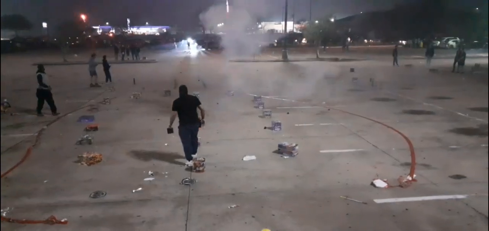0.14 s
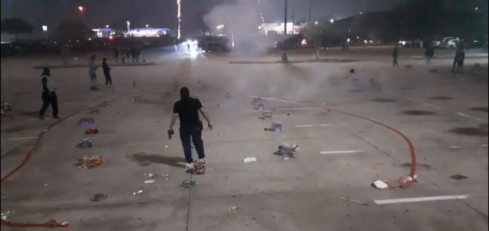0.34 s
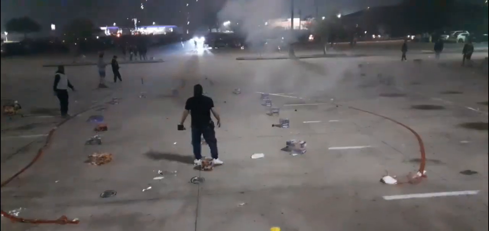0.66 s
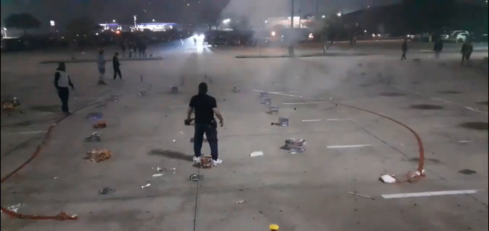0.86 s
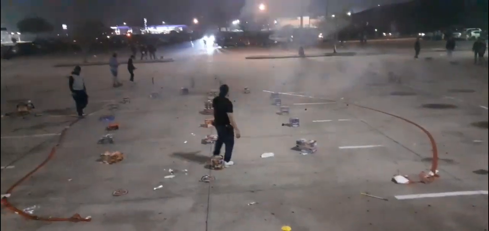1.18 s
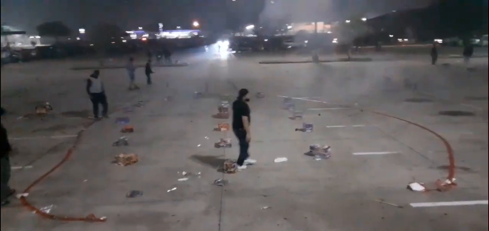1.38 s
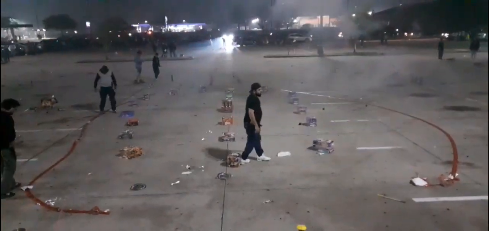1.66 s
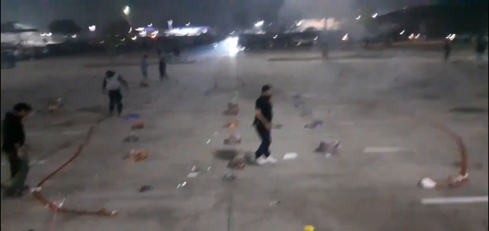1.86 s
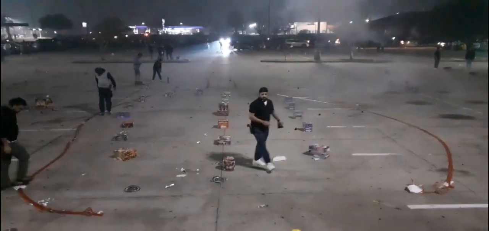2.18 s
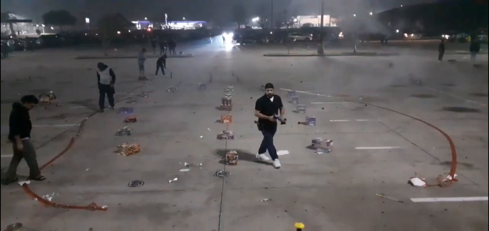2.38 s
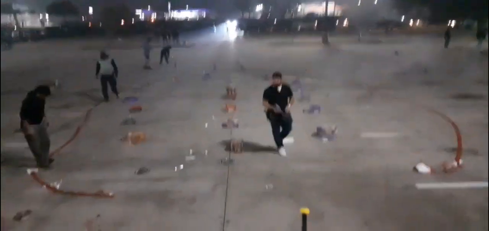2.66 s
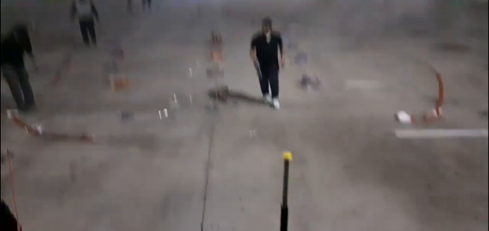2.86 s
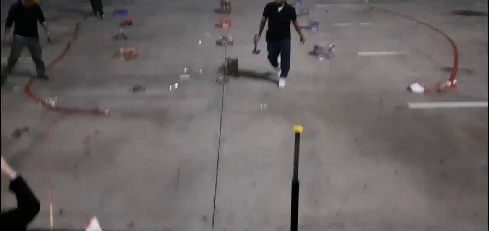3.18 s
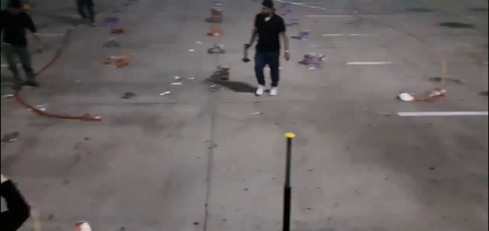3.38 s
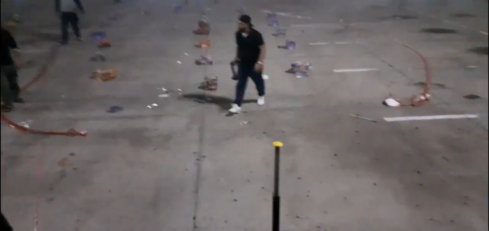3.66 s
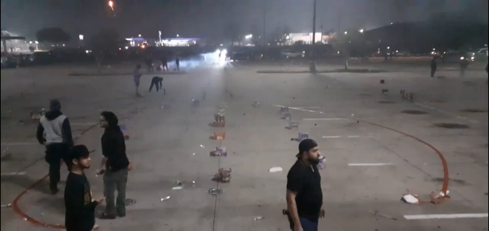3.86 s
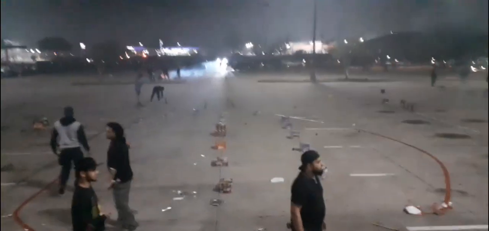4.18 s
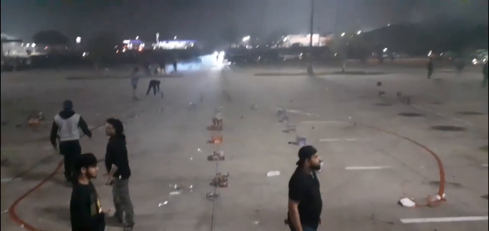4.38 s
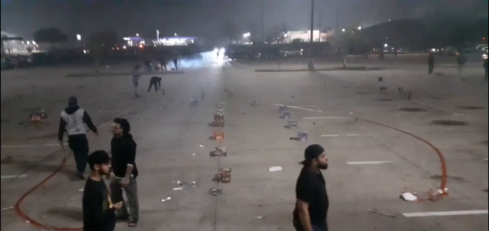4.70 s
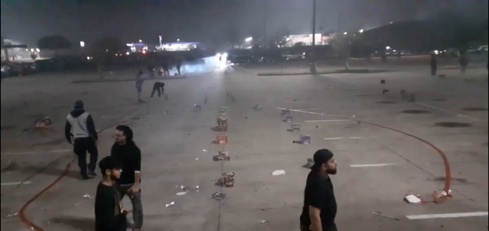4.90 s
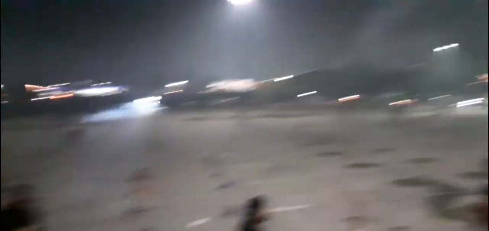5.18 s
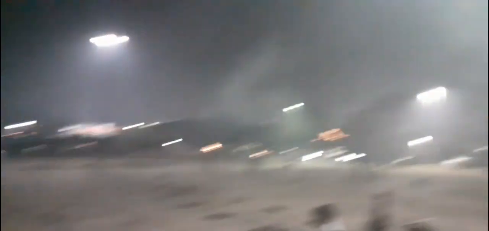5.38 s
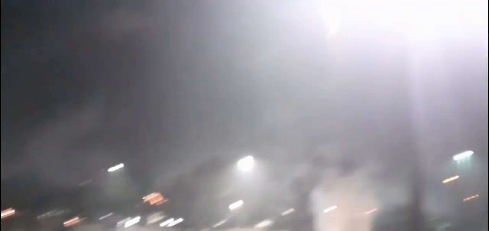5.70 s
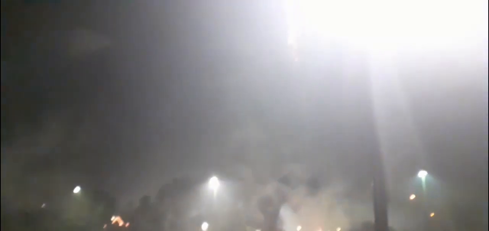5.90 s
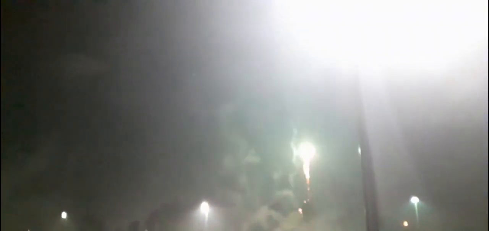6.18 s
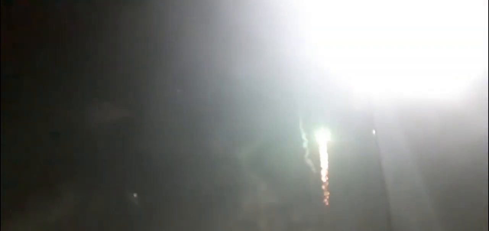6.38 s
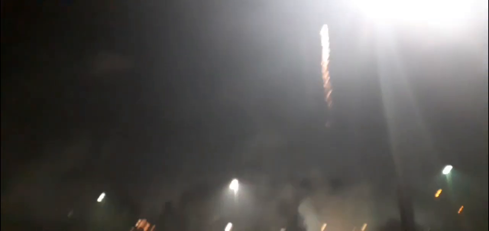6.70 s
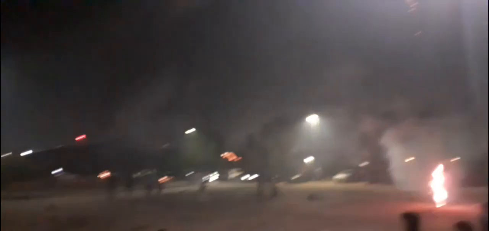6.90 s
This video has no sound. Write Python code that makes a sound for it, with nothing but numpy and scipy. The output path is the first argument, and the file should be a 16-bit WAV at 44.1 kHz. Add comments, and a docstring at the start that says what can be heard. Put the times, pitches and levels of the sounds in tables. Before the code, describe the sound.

Outdoors at night in a wide parking lot, a heavy firework boom hits at 0 s, a few low pushes rolling together and fading within half a second. Sharp near firecrackers snap from the very start in quick, uneven clusters, each with a ground bounce, short wall slaps and an echo. Behind them, farther fireworks and building echoes merge into rumble, clatter and crackle. Snaps bunch tightly around 2.6-2.8 s. At about 2.97 s the sound cuts to total silence, returning abruptly at 3.77 s with hard, dense bangs. Low thuds land near 4.4, 4.9 and 6.9 s; the volley continues unbroken to the end, about 7 s. Limiting holds loud snaps level and lets echoes swell between them. The crackers are to the right, shifting near centre around 5.3-5.7 s, then partly back right near 7 s. Treble is dull.

```python
"""An open parking lot at night: a firework booms, and strings of firecrackers snap in quick, uneven volleys.
Each cracker is a pressure spike with echoes; the boom, thuds, blurred bursts and far crackle are noise and pops.
The buildings' echoes merge with farther fireworks into a rolling crackle. The camera's limiter holds the loud
snaps to one height and ducks the rest, so echoes swell in the pauses. The camera has the near crackers on its
right, turns towards them late on, then partly back; the sound cuts out once for most of a second."""
import sys
import numpy as np
from scipy import signal
from scipy.fft import rfft, irfft
from scipy.io import wavfile
from scipy.ndimage import uniform_filter1d, minimum_filter1d, map_coordinates

SR = 44100
rng = np.random.default_rng(int(sys.argv[2]) if len(sys.argv) > 2 else 0)


def output_pcm(signal):
    """Save a mono or channel-first signal as 16-bit PCM at the path in sys.argv[1].

    Samples are clipped to [-1, 1] before scaling.
    """
    pcm = np.clip(np.atleast_2d(signal).T, -1, 1) * 32767
    wavfile.write(sys.argv[1], SR, np.round(pcm).astype(np.int16))


N = 310812


def amp(db):
    """Turn decibels into a gain."""
    return 10 ** (np.asarray(db) / 20)


def unit(x):
    """Scale to an average strength (rms) of 1."""
    return x / np.sqrt(np.mean(x ** 2) + 1e-20)


def along(points, hz):
    """Read a curve of (Hz, value) points, joined by straight lines on a log frequency axis."""
    point_hz, values = np.transpose(points)
    return np.interp(np.log(hz + 1), np.log(point_hz + 1), values)


def curves(rows):
    """Draw one curve over the whole scene for each column after the time."""
    s, *columns = np.transpose(rows)
    return [np.interp(np.arange(N) / SR, s, column) for column in columns]


def causal(db):
    """Make the tightest pulse with this dB spectrum that has no sound before its start (minimum phase)."""
    cepstrum = irfft(np.log(amp(db)))
    size = cepstrum.shape[-1]
    # fold the mirrored half forward in time
    fold = 1 + np.sign(np.fft.fftfreq(size))
    return irfft(np.exp(rfft(cepstrum * fold)))


def coloured(x, points):
    """Filter x with a causal pulse that follows (Hz, dB) points."""
    pulse = causal(along(points, np.fft.rfftfreq(4096, 1 / SR)))
    return signal.oaconvolve(np.atleast_2d(x), pulse[None], axes=1)[:, :x.shape[-1]]


def add(track, s, sound):
    """Mix a sound into the track at time s."""
    start = max(round(s * SR), 0)
    part = track[..., start:start + sound.shape[-1]]
    part += sound[..., :part.shape[-1]]


def fade(t, t60, rise_s):
    """A rise and decay of energy 1 that starts at t = 0; the decay loses 60 dB in t60 seconds."""
    age = np.maximum(t, 0)
    shape = amp(-60 * age / t60) * (1 - np.exp(-age / rise_s))
    return shape / np.linalg.norm(shape)


def wobble(rate):
    """A smooth random curve with rate knots a second."""
    knots = rng.standard_normal(int(N * rate / SR) + 4)
    return map_coordinates(knots, [np.arange(N) * rate / SR])


def stereo(front, left, right, alike):
    """The power share alike is one wave for both microphones; the rest differs between them."""
    return np.sqrt(alike) * front + np.sqrt(1 - alike) * np.array([left, right])


# Pushes and rolls that build the opening boom, then later low thuds
# columns: start_s, level_db (start of the roll), t60_s, push_db (against the start of the roll)
PUSHES_AND_ROLLS = [(0, -19, .9, 17), (0.0315, -16, .13, 31.5), (0.0378, -10.5, 0.16, 29),
                    (.062, -9.5, 0.11, 23.5), (.099, -13.5, 0.31, 20), (.147, -17, 0.3, 19),
                    (4.424, -28, 0.21, 24), (4.861, -20, .15, 11), (6.902, -19.5, 0.15, 25)]
# Colour of the boom and thuds, columns: pitch_hz, level_db
BOOM_COLOUR = [(25, -36.5), (60, -34), (110, -9.5), (170, -2.5), (220, -2.5), (310, 4), (400, -7.5),
               (580, -22.5), (740, -13.5), (1100, -40), (2500, -35.5), (6000, -70)]


def boom_and_thuds():
    """Each row is one sharp push and a roll of noise that fades steadily in dB; several rows build the boom."""
    track, t = np.zeros(N), np.arange(SR) / SR
    for s, db, t60, push_db in PUSHES_AND_ROLLS:
        roll = amp(-60 * t / t60) * rng.standard_normal(len(t))
        roll[0] -= amp(push_db)
        add(track, s, amp(db) * roll)
    # make up for the strength that the colour filter gives to noise
    gain = np.sqrt(np.mean(amp(along(BOOM_COLOUR, np.linspace(0, SR / 2, SR))) ** 2))
    return coloured(track / gain, BOOM_COLOUR)


# Where the near crackers lie: how much later the left microphone hears them, camera shadow included
# columns: time_s, delay_ms
CRACKER_BEARING = [(0, .5), (2.9, 0.501), (3.8, .475), (5.15, 0.49), (5.45, .3), (5.7, .14), (6.2, 0.15),
                   (6.75, 0.16), (7.05, 0.36)]


def from_the_right(x):
    """A wave reaches the right microphone first; the camera's shadow adds its own little delay later."""
    delay_ms, = curves(CRACKER_BEARING)
    shadow_ms = .07
    late = map_coordinates(x, [np.arange(N) - (delay_ms - shadow_ms) * SR / 1000], order=3)
    return np.array([late, x])


def pops(rate, spread_db, smear):
    """Random pops of uneven size, rms 1; the power share smear has blurred into steady noise."""
    size = amp(spread_db * np.clip(rng.standard_normal(N), -2, 2)) * rng.choice([-1, 1], N)
    separate = unit(size * (rng.random(N) < rate / SR))
    return np.sqrt(1 - smear) * separate + np.sqrt(smear) * rng.standard_normal(N)


def volley(colour, rate, spread_db, smear, alike, bearing=True):
    """Distant pops in stereo, rms 1: part is one wave at both microphones, the rest comes from all around."""
    front, left, right = (pops(rate, spread_db, smear) for _ in range(3))
    shared = from_the_right(front) if bearing else front
    return unit(coloured(stereo(shared, left, right, alike), colour))


# Near firecrackers; peak is before the limiter, thump is extra bass, snap is treble tilt
# columns: start_s, peak_db, thump_db, snap_db_per_octave
NEAR_CRACKERS = [(0.0077, -3, 10, 2), (0.0317, 1, 7, 2), (0.129, -4, 8, 2), (0.1976, 1, 7, 0.5),
                 (0.2189, 0.0, 9, -2), (0.2266, 1, -2, -4), (0.273, 2.5, -9, -2), (0.3333, -2, -10, 0),
                 (0.3661, -3, 0, 1), (0.3857, 3, 1, -5), (0.4578, 3, 0.5, 0), (0.4778, 3.0, 1, -5),
                 (0.51, -0.5, 2, -3.5), (0.5662, 0, -8, -7), (0.596, 0, -7, -8), (0.608, -1.5, -7, -4.5),
                 (0.6699, 1.5, -6, -4.5), (0.725, 3, -6, -1.5), (0.7305, 1, 6, -4), (0.7352, 3.5, 3.5, -5),
                 (0.7593, -6, -2, -1), (0.7825, 4.5, 3, -1), (0.8705, -7, 5, 1), (0.889, -2.5, -10, 0),
                 (0.9415, 2.5, -9, -1.5), (0.9447, 0.5, 7, 2), (1.0634, -1.5, -1, 1.5),
                 (1.1128, -2.5, -7, -3), (1.1228, 2.5, 2.5, 1), (1.1432, 2.5, 2, -1), (1.1964, -0.5, 1, -3),
                 (1.2772, 1.5, 0, 1), (1.3194, 4, 4, -1), (1.3269, 5, -4, 0), (1.3374, 4.5, 0, -1),
                 (1.414, 3.5, 6, 2.5), (1.6231, 5.5, 3, 1.5), (1.65, 3.5, -2, -1), (1.6637, 0.5, -5, -1),
                 (1.6932, 4.5, -1, 0), (1.7327, -0.5, -12, -3), (1.7929, 8.5, 3, -1.5), (1.8053, 6, -1, 0),
                 (1.8122, 2, 1, -5), (1.8249, 3.5, 1, -8), (1.9353, 7, 2, 4), (1.9541, 5.5, -3, -4),
                 (2.0089, 6.0, 7, 5), (2.0392, 3, -0.5, 0), (2.1305, 3.5, 1, 2.5), (2.2514, 5.5, 7, 2.5),
                 (2.2574, 7, -6, -1), (2.3093, 5, 4, 3.5), (2.3218, 3, 5, 2), (2.3393, 5, 2, 2),
                 (2.496, 3.5, -2.5, 0.5), (2.541, 4, 1, 1.5), (2.627, 3, -1, 4), (2.6347, 2, 4, 0),
                 (2.6392, 4.0, -7, -5), (2.6567, 7, 1, 2), (2.6728, 6, -6, 3), (2.6817, 6.5, -1, -3),
                 (2.694, 11.5, -6, 1), (2.6998, 9.0, -10, 1), (2.713, 8.5, 1, -6), (2.7268, 10, 2, -1),
                 (2.7717, 8.5, 2, 1), (2.8221, 4, -3, 3), (2.841, 6, 8, 5), (2.9447, 6, 1, -2),
                 (2.948, 1.5, 0, 8.5), (3.7957, 7.5, -1, 1.5), (3.802, 1, 4, 5), (3.8193, 9.5, 6, 2),
                 (3.8256, -1, -4, 9), (3.917, 5.5, -3.5, 2.5), (3.9379, 9, 4, 3.5), (3.974, 8, -1, 1.5),
                 (4.0127, 10.5, 4, 0), (4.0519, 10.5, 2, 0.5), (4.069, 8, -2, -6), (4.114, 2.5, -5, 0),
                 (4.1185, 3.0, -9, -8), (4.1224, 8, 2, 1.5), (4.1596, 4.0, 7, 6.5), (4.213, 7, 1, -4),
                 (4.2612, 5, 7, 1), (4.2898, 6.5, 1.5, -1), (4.2934, 6.5, 1, 0), (4.3073, 9, 5, 1),
                 (4.333, 2.5, 6, 6), (4.3551, 8.5, 5, 7), (4.3617, 6, -4, -13), (4.3717, 3.5, 1, 3),
                 (4.382, -2, -9, -4), (4.388, -3, 3, 1), (4.4295, 7.5, 8, 0), (4.5677, 6.5, 7, -1.5),
                 (4.6306, -2, 11, 4.5), (4.757, 6.0, 5, -1), (4.7661, 8.5, 4, 1), (4.7734, 4, 3, 2),
                 (4.777, 0, 6, 20), (4.7982, 4, -3, -2), (4.8037, 7.5, 3, 6), (4.8344, 5, 0, -1),
                 (4.851, 9.5, 9, 8.5), (4.8628, 6, 6, -1), (4.8718, 4.5, 17, 12), (4.9087, 1, 4, 0),
                 (4.9173, 6.5, -2, 0), (4.9636, 3, 7.5, 5), (4.9983, 5, 8, 2), (5.0838, -1.5, 5, 0.5),
                 (5.1324, 2.5, -7, -5), (5.2716, 2.5, -1, -3), (5.2917, 2.5, 8, -14), (5.3208, 4.5, -2, -5),
                 (5.3363, 6, 4, 1.5), (5.34, 2.5, -1, 0), (5.3773, 3.5, -1, 0.5), (5.4133, -1.5, 0, -13),
                 (5.4305, 2.0, -7, -6), (5.4891, 5.5, -5, -2.5), (5.532, 2, 3, -1.5), (5.5491, 8.5, 0, -4),
                 (5.5962, 8, -3, -1), (5.6043, 7.0, 0, -14), (5.618, 5.0, 2, 2), (5.6338, 6.5, -2, -5),
                 (5.6533, 5, 7, 3.5), (5.6798, 2.5, 4, 2.5), (5.711, 8, 0, -1.5), (5.8121, 7.5, 1, -1.5),
                 (5.8183, 3.5, 2, -8), (5.8634, 6, -4, 0), (5.8888, 1.5, -11, -10), (5.941, 3, 2, 3),
                 (5.9502, 5, -7, -3), (5.9587, 1.5, 2, -6), (5.9785, 5.5, 4, -1), (6.0005, 4, 2, -2),
                 (6.0343, 3, 0, 1), (6.0484, 3.0, -4, -7), (6.0563, 3, -3, -2), (6.0601, 0.5, -7, 3),
                 (6.1167, 3.5, -1, -4), (6.1516, 5.5, -3, -2.5), (6.1833, 2, 6, -1.5),
                 (6.2143, -1, -12, -1), (6.2904, 5.5, -5, -2), (6.3132, 7, -3, -7.5), (6.391, 6, -1, -6),
                 (6.4274, 4.5, 1, -6), (6.4563, 3.5, 10, 3.5), (6.4827, 1.5, 6.5, -3), (6.5031, 0, 8, -2),
                 (6.5176, 4, -6, -8), (6.5422, 6, -10, -2.5), (6.5735, 0.5, 3, 0), (6.6006, 5, -2, 2),
                 (6.6183, 3.5, -6, -11), (6.6261, 5, 3, 1.5), (6.644, 0.5, 0, -11), (6.6808, -2.5, -5, 2),
                 (6.6933, 3.5, 4, 2), (6.7145, 3.5, -8, 0), (6.7378, 5.5, -20, 1), (6.7602, 2.0, 5, 3),
                 (6.784, -4, -4, -9), (6.807, 6, 1, 1), (6.8242, 4, -1.5, 0), (6.8414, 8, -5, -0.5),
                 (6.8575, 4, -9, -2), (6.9266, 8, -10, 2.5), (6.9511, 6.5, -7, 1), (6.9561, 4, 6, -1),
                 (6.9708, -2, 11, 2), (6.976, 2.5, 13, 2), (6.9957, 3.5, 3, 1), (7.0218, 5.5, -8, -3)]
# The buildings' answer to each cracker
# columns: delay_s, rise_s, t60_s, rumble_db, clatter_db, crackle_db
BUILDING_ECHOES = [(.006, 0.0082, 0.98, -8, -5.5, -1), (.083, .002, 0.073, -9.5, -6, -2.5),
                   (0.556, .002, .04, -20, -17, -19.5)]


def echo_power(uneven_db=1.5):
    """Power that buildings send back as rumble, clatter and crackle; each takes a cracker a bit differently."""
    s, db, _, _ = np.transpose(NEAR_CRACKERS)
    t, power = np.arange(SR) / SR, np.zeros((3, N))
    uneven = uneven_db * rng.standard_normal((len(s), len(BUILDING_ECHOES)))
    strengths = amp(db[:, None] + uneven)
    for (delay, rise, t60, *bands_db), strength in zip(BUILDING_ECHOES, strengths.T):
        blasts = np.bincount(np.round(np.abs(s) * SR).astype(int), strength ** 2, N)
        spread = fade(t - delay, t60, rise_s=rise) ** 2
        answer = np.abs(signal.fftconvolve(blasts, spread)[:N])
        power += amp(bands_db)[:, None] ** 2 * answer
    return power


# The farther fireworks' own levels, before echoes and the overall trims join them
# columns: time_s, rumble_db, clatter_db, crackle_db
FAR_LEVELS = [(0, -22, -24, -23.5), (.2, -23, -34, -29.5), (.7, -35.5, -45, -33.5), (1.1, -39, -54, -36),
              (1.6, -36.5, -40, -41), (1.85, -34.5, -33, -27), (2.4, -28.5, -28, -25.5),
              (2.55, -35.5, -47, -34.5), (2.95, -32, -29, -28), (3.8, -29, -22.5, -21), (4, -40, -28, -38),
              (4.5, -30.5, -24.5, -32), (5.2, -34.5, -31.5, -31.5), (5.6, -28, -30.5, -24.5),
              (6.1, -38, -31.5, -30), (6.6, -30, -27.5, -26), (7.05, -43, -32, -29)]
# Colours of the far sounds, from dull to bright; only the shape counts
# columns: pitch_hz, level_db
RUMBLE_COLOUR = [(20, -28.5), (40, -23), (60, -4), (85, -8), (103, 3), (135, -1), (180, -3.5), (260, 3.5),
                 (340, 6.5), (430, -1), (560, -11.5), (1000, -44.5)]
CLATTER_COLOUR = [(200, -36), (380, -11.5), (480, -2.5), (750, 3), (1100, -3), (1400, -10), (2500, -28)]
CRACKLE_COLOUR = [(600, -39.5), (1000, -6.5), (1300, -2), (1900, 4), (2600, 1), (3500, -5.5), (4800, -11.5),
                  (6300, -25)]


def far_fireworks(rumble_db=-0.5, clatter_db=-0.63, crackle_db=-1, clump_db=1.84, clump_rate=70):
    """Far bursts and echoes merge; the longer the way, the duller: crackle, clatter, then rumble."""
    rumble, clatter, crackle = np.sqrt(amp(curves(FAR_LEVELS)) ** 2 + echo_power())
    # clatter and crackle bunch up together
    clumps = clump_db * wobble(clump_rate)
    low = volley(RUMBLE_COLOUR, rate=160, spread_db=2, smear=.6, alike=1.0, bearing=False)
    middle = volley(CLATTER_COLOUR, rate=220, spread_db=6.5, smear=0.44, alike=0.44)
    high = volley(CRACKLE_COLOUR, rate=400, spread_db=0.5, smear=0.31, alike=0.071)
    return (rumble * amp(rumble_db) * low
            + clatter * amp(clatter_db + clumps) * middle
            + crackle * amp(crackle_db + clumps) * high)


def reflections(size, rate):
    """Separate reflections at each microphone, rate a second, rms 1."""
    return unit(rng.standard_normal((2, size)) * (rng.random((2, size)) < rate / SR))


# Colour of one near blast, columns: pitch_hz, level_db
BLAST_COLOUR = [(30, -14), (60, -16.5), (110, 7.5), (180, 8.5), (260, 15), (340, 23), (450, 12), (800, 17),
                (1200, 15), (1900, 19.5), (2600, 15.5), (3500, 10.5), (4800, 6.5), (6300, -2)]
# The treble of the whole sound: a deep dip near 10 kHz, some fizz above it; columns: pitch_hz, level_db
OVERALL_TREBLE = [(6300, 0), (8000, -18.5), (10000, -31.5), (12500, -16), (15000, -14), (16500, -24.5)]
# Where a snap's colour varies by chance, column: pitch_hz
TEAR_PITCHES = [700, 1100, 1600, 2200, 3000, 4200]
TEAR_DB = 1.68
# A cracker's bounce off the ground: usual delay and its spread
BOUNCE_MS, BOUNCE_OCTAVES = .4, .7
# A flat facade returns each snap as a small sharp copy: delay and level, each with its spread
FACADE_S, FACADE_SPREAD_S, FACADE_DB, FACADE_SPREAD_DB = .0415, .0008, -23, 2.5
FACADE_TREBLE_DB_PER_OCTAVE = 3  # the copy is thinner and brighter
# Near walls that slap each snap back, columns: delay_s, level_db, t60_s
WALL_SLAPS = [(0.0185, -18.5, 0.017), (0.0406, -19.5, .02)]


def crackers(body_db=-1.0, thump_hz=900, snap_hz=2350, scatter_db=-10, scatter_t60=0.011, bounce=0.48,
             echo_db=-13.0, echo_t60=0.42):
    """Each cracker is one pressure spike, a ground bounce, nearby scatter, slaps off walls and a faint echo."""
    hz, t = np.fft.rfftfreq(1024, 1 / SR), np.arange(SR // 5) / SR
    low = 1 / (1 + (hz / thump_hz) ** 4)
    high = np.clip(np.log2((hz + 1) / snap_hz), 0, 1.35)  # octaves above snap_hz
    direct, around = np.zeros(N), np.zeros((2, N))
    scatter = amp(scatter_db) * fade(t, scatter_t60, rise_s=0.00078)
    tail = amp(echo_db) * fade(t, echo_t60, rise_s=0.017)
    for delay, db, t60 in WALL_SLAPS:
        tail = tail + amp(db) * fade(t - delay, t60, rise_s=0.0009)
    bounces_ms = BOUNCE_MS * 2 ** (BOUNCE_OCTAVES * rng.standard_normal(len(NEAR_CRACKERS)))
    for (s, db, thump_db, snap_db), bounce_ms in zip(NEAR_CRACKERS, bounces_ms):
        # a bigger charge pushes more bass; a steeper front snaps brighter
        colour = along(BLAST_COLOUR, hz) + (body_db + thump_db) * low + snap_db * high
        # no two casings tear alike
        tear = TEAR_DB * rng.standard_normal(len(TEAR_PITCHES))
        colour = colour + along(np.c_[TEAR_PITCHES, tear], hz)
        # set the height as it will be after the overall treble filter
        peak = np.abs(causal(colour + along(OVERALL_TREBLE, hz))).max()
        spike = amp(db) * causal(colour) / peak
        start = s - .0001
        add(direct, start, spike)
        # each one lies differently on the ground, so its bounce combs it differently
        add(direct, start + bounce_ms / 1000, bounce * spike)

        slap_db = db + FACADE_DB + rng.normal(0, FACADE_SPREAD_DB)
        slap = amp(slap_db) * causal(colour + FACADE_TREBLE_DB_PER_OCTAVE * high) / peak
        add(around, start + FACADE_S + rng.normal(0, FACADE_SPREAD_S), slap)

        answer = scatter * rng.standard_normal((2, len(t))) + tail * reflections(len(t), rate=600)
        add(around, start, signal.fftconvolve(spike[None], answer, axes=1))
    return from_the_right(direct) + around


# Blurred bursts: the boom's bloom, low thuds, echo swells and a coloured crack
# columns: start_s, level_db, pitch_hz (centre of the band), t60_s
BURSTS = [(.034, -23, 700, .2), (2.331, -29, 90, .2), (2.367, -27.5, 125, .13), (2.39, -22.5, 700, 0.18),
          (2.505, -27, 100, .23), (3.774, -20.5, 794, 0.039), (5.793, -25, 1900, .045),
          (5.89, -20, 2090, 0.089)]


def blurred_bursts(width_octaves=0.62, alike=0.75):
    """Each blurred burst is a band of noise that swells for a few milliseconds and then fades."""
    track, t = np.zeros((2, N)), np.arange(SR // 4) / SR
    octaves = np.log2(np.fft.rfftfreq(len(t), 1 / SR) + 1)
    for s, db, hz, t60 in BURSTS:
        band = np.exp(-.5 * ((octaves - np.log2(hz)) / width_octaves) ** 2)
        noise = rng.standard_normal((3, len(t)))
        front, left, right = unit(irfft(rfft(noise) * band, len(t)))
        swell = fade(t, t60, rise_s=0.00091)
        add(track, s, amp(db) * swell / swell.max() * stereo(front, left, right, alike))
    return track


# Shadow of the camera body on the left microphone, columns: pitch_hz, level_db
CAMERA_SHADOW = [(100, -2), (300, -3), (750, 0.5), (1200, -1.5), (1900, -7.5), (2600, -12.5), (3500, -12),
                 (5000, -15.5), (10000, -0.5), (14000, -5)]


def scene():
    """All the fireworks together, with the left microphone shaded by the camera."""
    left, right = boom_and_thuds() + far_fireworks() + crackers() + blurred_bursts()
    return np.array([coloured(left, CAMERA_SHADOW)[0], right])


def limiter(x, ceiling=1.0, release_db_per_s=113, size=400):
    """Turns both channels down a few milliseconds ahead of a peak, holds, then recovers at a steady dB pace."""
    over_db = 20 * np.log10(np.maximum(np.abs(x).max(axis=0) / ceiling, 1))
    held_db = -minimum_filter1d(-over_db, size)
    recovery_db = release_db_per_s * np.arange(N) / SR
    cut_db = np.maximum.accumulate(held_db + recovery_db) - recovery_db
    return x * amp(-uniform_filter1d(cut_db, size=140))


SILENT_FROM_S, SILENT_TO_S = 2.97, 3.7735
TOP_HZ = 16300


def record(dry):
    """The treble is dull, the limiter catches the loud snaps, and the sound cuts out once."""
    t = np.arange(N) / SR
    # a 15 ms fade into the silence and a 2 ms fade out of it
    going, returning = (SILENT_FROM_S - t) / .015, (t - SILENT_TO_S) / .002
    audible = np.clip(np.maximum(going, returning), 0, 1)
    heard = limiter(coloured(dry, OVERALL_TREBLE)) * audible
    return signal.sosfiltfilt(signal.butter(16, TOP_HZ, fs=SR, output="sos"), heard)


dry = scene()
out = record(dry)
output_pcm(out)
```